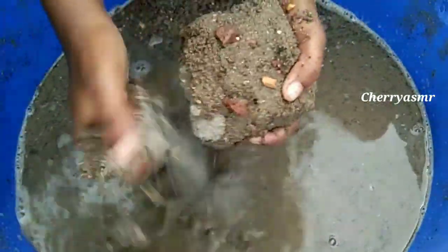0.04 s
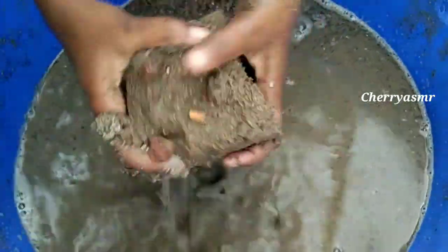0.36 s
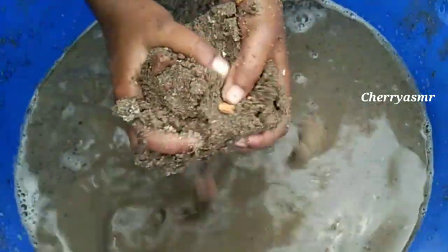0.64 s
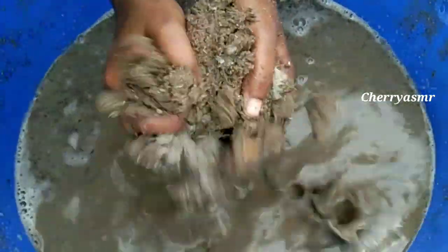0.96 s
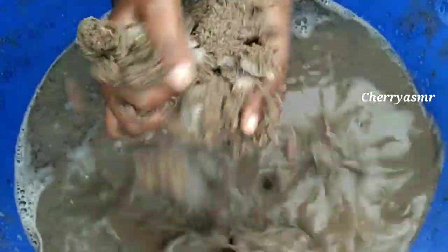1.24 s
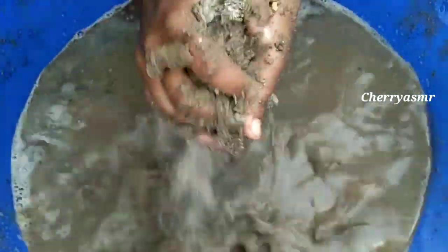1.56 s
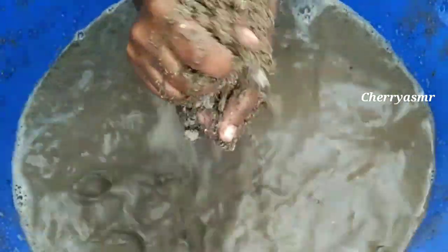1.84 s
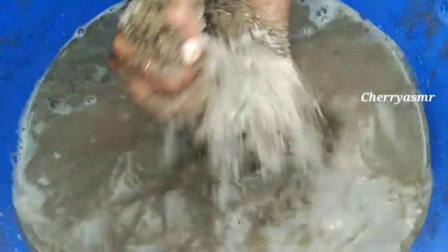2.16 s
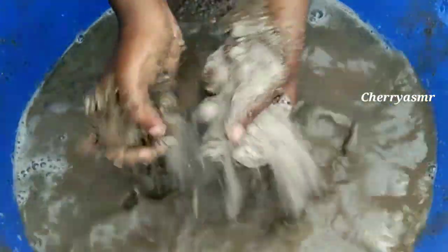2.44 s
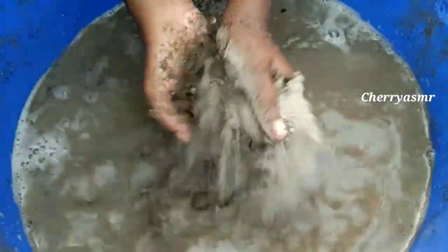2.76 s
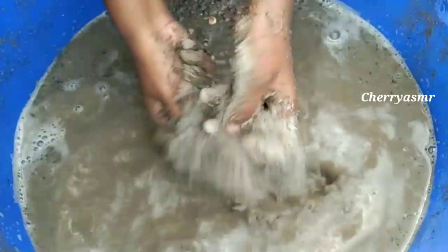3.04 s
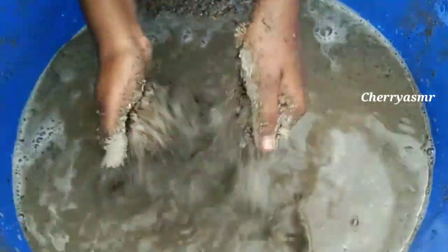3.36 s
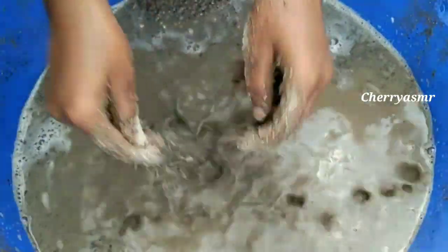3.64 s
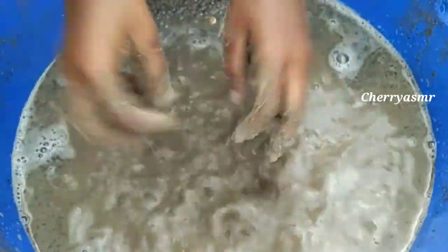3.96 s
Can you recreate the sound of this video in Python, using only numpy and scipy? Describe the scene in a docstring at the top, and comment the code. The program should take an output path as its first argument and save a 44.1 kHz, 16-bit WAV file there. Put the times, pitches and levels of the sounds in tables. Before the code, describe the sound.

A dry sandy block crumbles into a tub of water, close up, with crisp snaps, hissing sand and small plops from the start. From about 0.9 to 1.7 seconds the cracking and gritty splashing grow loudest, with big clods gulping in at 0.9 and 1.6. A few more snaps come around 2 to 2.3 seconds, then lighter fizzing and plops continue, fading near 4 seconds over a low steady rumble.

```python
"""Sand and cement crumbled into water

Two hands crumble a dry block over a plastic tub of muddy water, heard close up.
The block snaps and sheds hissing sand; grit fizzes on the water, lumps plop in, two big clods plunge.
The tub wall returns short echoes, over a low steady rumble."""
import sys
import numpy as np
from scipy import signal
from scipy.fft import rfft, irfft
from scipy.io import wavfile

SR = 44100
rng = np.random.default_rng(int(sys.argv[2]) if len(sys.argv) > 2 else 0)


def write(x):
    x = np.atleast_2d(x).T
    wavfile.write(sys.argv[1], SR, np.round(np.clip(x, -1, 1) * 32767).astype(np.int16))


N = 176400
BUBBLE_GLIDE_PER_S = 1.6
GRAIN_SPREAD_DB = 4


def amp(db):
    """Decibels to gain."""
    return 10 ** (np.asarray(db) / 20)


def unit(x):
    """Scale to rms 1."""
    return x / np.sqrt(np.mean(x ** 2) + 1e-20)


def add(mix, time_s, sound):
    """Mix a sound in at time_s."""
    part = mix[max(0, round(time_s * SR)):][:len(sound)]
    part += sound[:len(part)]


def colour(x, spectrum):
    """Minimum-phase filter of the given shape; white noise keeps its power."""
    hz, db = np.transpose(spectrum)
    bin_hz = abs(np.fft.fftfreq(4096, 1 / SR))
    gain = unit(amp(np.interp(np.log(bin_hz + 1), np.log(hz), db)))
    response = np.exp(np.conj(signal.hilbert(np.log(gain))))
    return signal.fftconvolve(x, np.fft.ifft(response).real)[:len(x)]


def wander(top_hz):
    """Random drift of rms 1 in the decade below top_hz."""
    hz = np.fft.rfftfreq(N, 1 / SR)
    band = (hz < top_hz) & (hz > top_hz / 10)
    return unit(irfft(rfft(rng.standard_normal(N)) * band, N))


def impacts(per_s, spread_db):
    """Random clicks, mostly small, a few large."""
    size = amp(spread_db * np.minimum(rng.exponential(1, N), 4.5))
    return size * rng.choice([-1, 1], N) * (rng.random(N) < per_s / SR)


def echoes(decay_s, samples):
    """Sparse decaying reflections of energy 1."""
    t = np.arange(samples) / SR
    taps = rng.standard_normal(samples) * np.exp(-t / decay_s)
    taps *= (rng.random(samples) < 0.1) & (t > 0.0015)
    return taps / (np.linalg.norm(taps) + 1e-12)


def burst(decay_s):
    """Decaying puff of noise."""
    t = np.arange(SR // 5) / SR
    return rng.standard_normal(len(t)) * np.exp(-t / decay_s)


def swell(t, peak_s):
    """Envelope: rises to 1 at peak_s, then decays."""
    return t / peak_s * np.exp(1 - t / peak_s)


# Falling material: (time [s], sand level [dB], grit level [dB])
FLOW = [(0, -34.5, -36), (.08, -45.5, -43), (.18, -38, -37), (.26, -44.5, -38.5), (.33, -38.5, -41),
        (.40, -43.5, -46), (.52, -37.5, -39), (.66, -44, -46.5), (.81, -47, -45), (.91, -42.5, -36),
        (.97, -41.5, -48.5), (1.072, -32, -32), (1.159, -45.5, -44.5), (1.21, -34.5, -28.5),
        (1.31, -42.5, -36), (1.345, -38.5, -30), (1.43, -35.5, -38), (1.55, -44, -36.5), (1.601, -30, -24),
        (1.68, -42, -34.5), (1.749, -35, -36.5), (1.92, -42.5, -42), (2.25, -43.5, -43.5), (2.45, -42, -39),
        (2.88, -42, -40.5), (3.17, -46, -46.5), (3.33, -41.5, -39), (3.68, -44, -47.5), (3.89, -43.5, -54),
        (3.97, -56, -59)]

def flow():
    """Gain curves of the running sand and the landing grit."""
    time_s, sand_db, grit_db = np.transpose(FLOW)
    t = np.arange(N) / SR
    return amp(np.interp(t, time_s, sand_db)), amp(np.interp(t, time_s, grit_db))


# Sand hiss spectrum: (frequency [Hz], relative level [dB])
HISS_SPECTRUM = [(300, -15), (2000, 2), (5000, -5.5), (6500, 1), (8200, 2.5), (10500, -3.5), (15500, -31)]

def sand(gain, hiss_db=-4.5, grains_db=-8.5, clump_db=2.5):
    """Fine sand hisses in small clumps; coarser grains tick in it."""
    grains = amp(grains_db) * unit(impacts(per_s=1300, spread_db=GRAIN_SPREAD_DB))
    hiss = amp(hiss_db) * rng.standard_normal(N)
    clumps = amp(clump_db * wander(top_hz=55))
    return colour((hiss + grains) * gain * clumps, HISS_SPECTRUM)


def bubble(hz, decay_s):
    """Trapped air rings, rising slightly in pitch."""
    t = np.arange(SR // 16) / SR
    cycles = hz * (t + BUBBLE_GLIDE_PER_S * (t - 2 * decay_s) * t / 2)
    return np.exp(-t / decay_s) * np.sin(2 * np.pi * cycles)


# Water wash spectrum: (frequency [Hz], relative level [dB])
WASH_SPECTRUM = [(200, -14), (550, 6), (1300, -3.5), (2200, 2.5), (3500, -10.5), (9000, -54)]

def grit(gain, fizz_db=-6, wash_db=-5.5, clump_db=3):
    """Grit peppers the water: many tiny bubbles over a swishing wash."""
    low_hz, high_hz, sizes = 942, 4460, 36
    bubbles_per_s, decay_cycles, tilt_db_per_oct = 600, 1.8, -4.5
    fizz = np.zeros(N)
    for hz in np.geomspace(low_hz, high_hz, sizes):
        ring = bubble(hz, decay_cycles / hz) * np.sqrt(hz)  # equal energy before the tilt
        ring *= amp(tilt_db_per_oct * np.log2(hz / low_hz))
        fizz += signal.oaconvolve(impacts(bubbles_per_s / sizes, spread_db=5), ring)[:N]
    wash = colour(rng.standard_normal(N) * amp(clump_db * wander(top_hz=200)), WASH_SPECTRUM)
    return gain * (amp(fizz_db) * unit(fizz) + amp(wash_db) * wash)


# Background spectrum: (frequency [Hz], relative level [dB])
RUMBLE_SPECTRUM = [(30, -31), (45, -4), (57, 0.5), (150, -7), (178, -7), (240, -17.5), (550, -28),
                   (4000, -47.5)]

def rumble(rms_db=-35.5):
    """Low steady background noise."""
    return amp(rms_db) * unit(colour(rng.standard_normal(N), RUMBLE_SPECTRUM))


def plop(hz, db, ring_db, ring_max_db=-9, tilt_db_per_oct=-1.5, echo_db=-4.5):
    """A knock on the surface, then a weaker bubble ring; the tub wall echoes each spot differently."""
    t = np.arange(SR // 16) / SR
    knock = amp(db) * swell(t, peak_s=0.61 / hz)
    ring_level_db = min(db + ring_db + tilt_db_per_oct * np.log2(hz / 1000), ring_max_db)
    decay_s = 0.005 * (1000 / hz) ** 0.76  # small bubbles die sooner
    ring = amp(ring_level_db) * np.exp(-t / decay_s)
    cycles = hz * t * (1 + BUBBLE_GLIDE_PER_S * t / 2)
    direct = np.maximum(knock, ring) * np.sin(2 * np.pi * cycles)
    wall = signal.fftconvolve(direct, echoes(decay_s=0.0021, samples=1000))[:len(t)]
    return direct.std() * unit(direct + amp(echo_db) * wall)


# Lumps hitting the water: (time [s], pitch [Hz], level [dB])
LUMPS = [(0.0061, 3030, -8), (0.0248, 3670, -12.5), (0.043, 1760, -18), (0.074, 3480, -16.5),
         (0.1179, 890, -24.5), (0.129, 2150, -19), (0.1686, 1150, -15.5), (0.21, 1640, -17.5),
         (0.2329, 750, -21), (0.2482, 1255, -13.5), (0.3153, 2080, -14), (0.3427, 1420, -22.0),
         (0.4495, 2200, -20), (0.4562, 3760, -17.5), (0.5356, 1275, -15), (0.5739, 1330, -10),
         (0.6, 1770, -18.0), (0.9101, 1630, -15.5), (0.9167, 1140, -5), (1.1199, 853, -10),
         (1.193, 1440, -8.5), (1.213, 1770, -14), (1.2318, 600, -18), (1.2478, 1800, -11),
         (1.2778, 1400, -13.5), (1.2922, 1324, -2.0), (1.3448, 1350, -2), (1.3946, 630, -10.5),
         (1.4834, 1750, -2), (1.5509, 1260, -12), (1.5751, 2260, -3), (1.657, 1293, -9.0),
         (1.6642, 559, -19), (1.683, 1730, -8.5), (1.694, 1376, -9.5), (1.834, 651, -22),
         (1.9748, 2470, -16), (2.1034, 2273, -12), (2.2847, 1850, -13.5), (2.3255, 1340, -19.5),
         (2.3935, 1790, -21.5), (2.4073, 806, -21.5), (2.4316, 1380, -16.5), (2.4941, 1270, -17),
         (2.5272, 1400, -13.5), (2.5627, 1350, -18.5), (2.5936, 2940, -16.5), (2.6369, 1146, -19),
         (2.6574, 890, -21), (2.7256, 1020, -17), (2.7974, 2120, -17.5), (2.8179, 1010, -9.5),
         (2.8693, 1130, -14), (3.051, 1146, -16.5), (3.066, 1180, -16.5), (3.2475, 2470, -20),
         (3.3588, 1250, -24.5), (3.384, 2480, -20), (3.497, 1140, -18.5), (3.5624, 1375, -8.5),
         (3.5719, 1170, -18), (3.6286, 3420, -18.5), (3.723, 2940, -20.5), (3.7347, 1030, -27),
         (3.7936, 1450, -18.5), (3.8051, 1280, -18.5), (3.9522, 2240, -28)]
# Splash spectrum: (frequency [Hz], relative level [dB])
SPLASH_SPECTRUM = [(300, -33.5), (1500, 10), (3600, 4), (5500, -6), (9000, -8), (16000, -29)]

def lumps(splash_db=-15.5):
    """Each lump plops in and throws a short splash."""
    plops, splashes = np.zeros(N), np.zeros(N)
    for time_s, hz, db in LUMPS:
        add(plops, time_s, plop(hz, db, ring_db=-2))
        add(splashes, time_s, amp(db + splash_db) * burst(decay_s=0.0035))
    return plops + colour(splashes, SPLASH_SPECTRUM)


def droplets(grit_gain, base_db=-19.5, max_per_s=100, full_rate_db=-36, low_hz=1283, high_hz=3400):
    """Crumbs and thrown-up drops patter down, denser and louder as more grit falls."""
    out = np.zeros(N)
    for slot, (jitter, pitch, chance) in enumerate(rng.random(size=(900, 3))):
        time_s = (slot + jitter) / max_per_s
        if time_s >= N / SR:
            break
        flow_ratio = grit_gain[int(time_s * SR)] / amp(full_rate_db)
        if chance < flow_ratio ** 2:
            hz = low_hz * (high_hz / low_hz) ** pitch
            add(out, time_s, plop(hz, base_db + 10 * np.log10(flow_ratio), ring_db=-5))
    return out


# Fractures of the dry block: (time [s], level [dB])
SNAPS = [(0.0255, -30), (0.075, -37.5), (0.164, -25), (0.321, -28), (0.7697, -26), (0.8547, -21),
         (.916, -21.5), (1.185, -22), (1.2067, -20), (1.231, -19), (1.2665, -25), (1.4825, -23.5),
         (1.579, -18), (1.603, -16.5), (1.619, -18), (1.974, -26), (2.052, -34.5), (2.285, -21),
         (2.321, -29)]
# Fracture spectrum: (frequency [Hz], relative level [dB])
SNAP_SPECTRUM = [(200, -36), (1200, -3.5), (3200, 5.5), (5200, -3.5), (8500, 6), (12000, -1), (16000, -22)]

def snaps(sand_gain, crackle_db=-3.5, click_db=15.5):
    """Each fracture is a click and a cluster of breaking grains; small ones crackle as the sand runs."""
    cracks = impacts(per_s=58, spread_db=GRAIN_SPREAD_DB)
    crackle_power = signal.oaconvolve(cracks ** 2, burst(decay_s=0.0015) ** 2)[:N]
    crackle_envelope = unit(np.sqrt(abs(crackle_power)))
    out = amp(crackle_db) * sand_gain * crackle_envelope * rng.standard_normal(N)
    for time_s, db in SNAPS:
        add(out, time_s, amp(db) * burst(decay_s=0.0034))
        add(out, time_s, amp([db + click_db]))
    return colour(out, SNAP_SPECTRUM)


# Plunging clods: (time [s], cavity pitch [Hz], gulp level [dB], rise [s], churn level [dB])
CLODS = [(0.9156, 533, -7, 0.0048, -29.5), (1.6189, 414, -8, 0.0022, -15)]
# Churning water spectrum: (frequency [Hz], relative level [dB])
CHURN_SPECTRUM = [(50, -5.5), (1000, -7), (2800, -27), (15000, -52)]

def clods():
    """A big clod opens a cavity that swells into a tight gulp; the water churns."""
    t = np.arange(SR // 16) / SR
    gulps, churn = np.zeros(N), np.zeros(N)
    for time_s, hz, gulp_db, rise_s, churn_db in CLODS:
        add(gulps, time_s, amp(gulp_db) * swell(t, rise_s) ** 2 * np.sin(2 * np.pi * hz * t))
        add(churn, time_s, amp(churn_db) * burst(decay_s=0.017))
    return gulps + colour(churn, CHURN_SPECTRUM)


def scene(room_db=-15):
    """Mono mix: sounds at the tub, a faint short room tail, rumble."""
    sand_gain, grit_gain = flow()
    near = lumps() + clods() + snaps(sand_gain)
    near += sand(sand_gain) + grit(grit_gain) + droplets(grit_gain)
    room = signal.fftconvolve(near, echoes(decay_s=0.0097, samples=9000))[:N]
    return (near + amp(room_db) * room + rumble())[None]


def record(dry, cutoff_hz=15750):
    """Low-pass band limit."""
    taps = signal.firwin(301, cutoff_hz, window=("kaiser", 9), fs=SR)
    return signal.oaconvolve(dry, taps[None], "same")


dry = scene()
out = record(dry)
write(out)
```